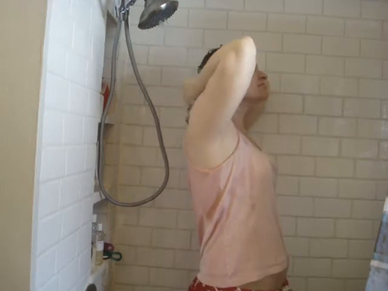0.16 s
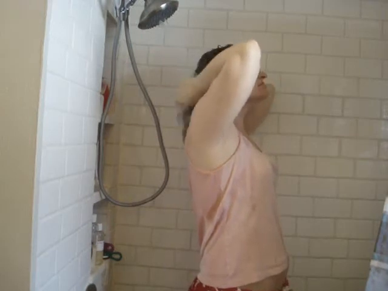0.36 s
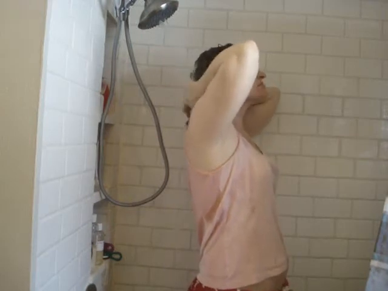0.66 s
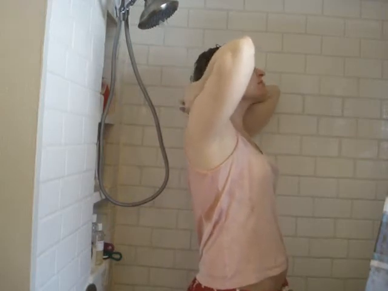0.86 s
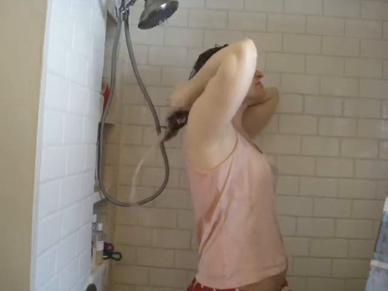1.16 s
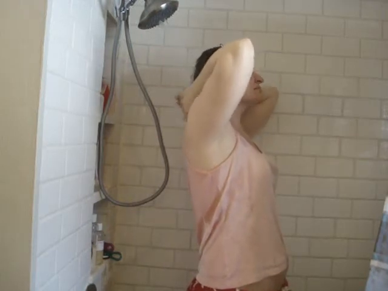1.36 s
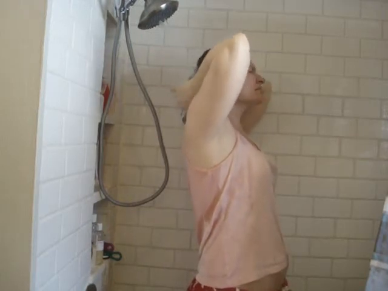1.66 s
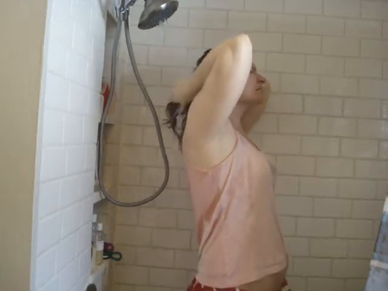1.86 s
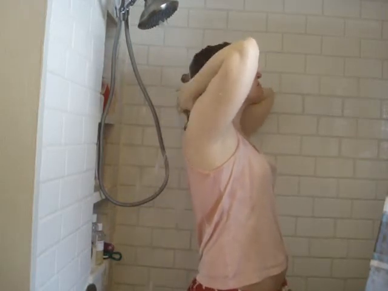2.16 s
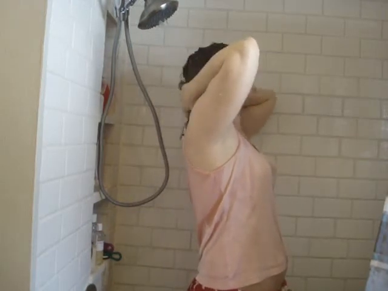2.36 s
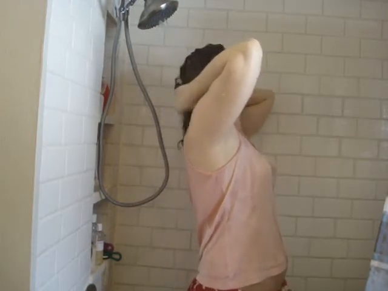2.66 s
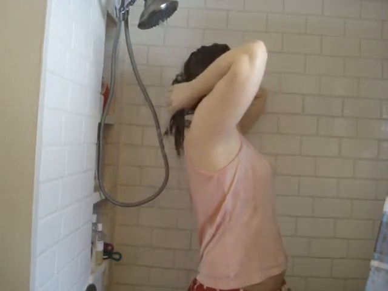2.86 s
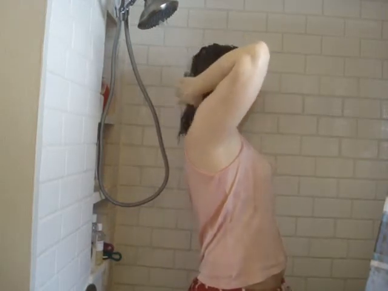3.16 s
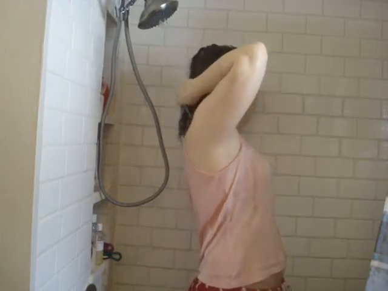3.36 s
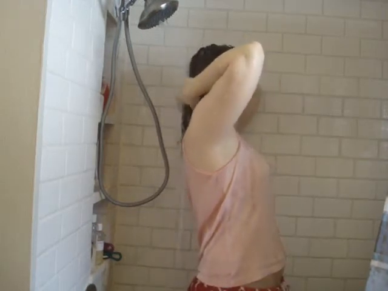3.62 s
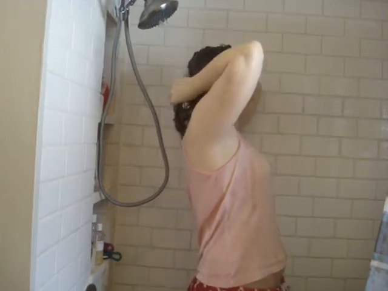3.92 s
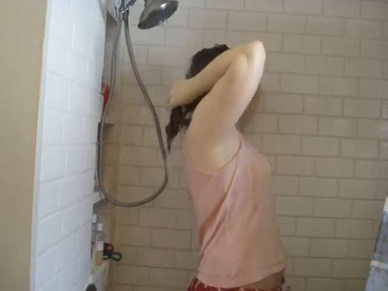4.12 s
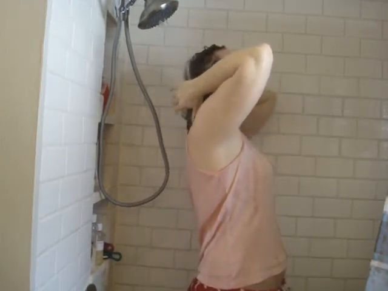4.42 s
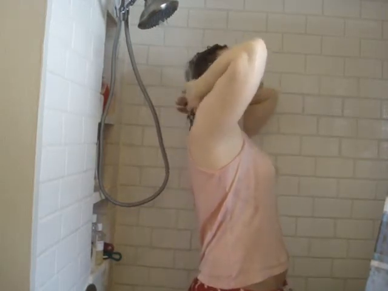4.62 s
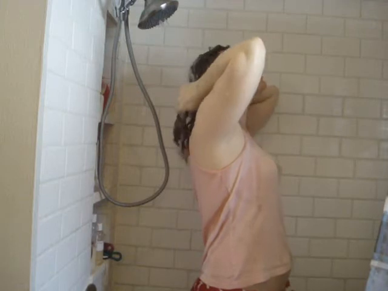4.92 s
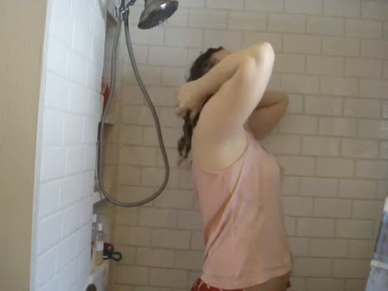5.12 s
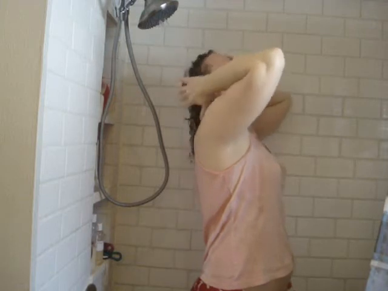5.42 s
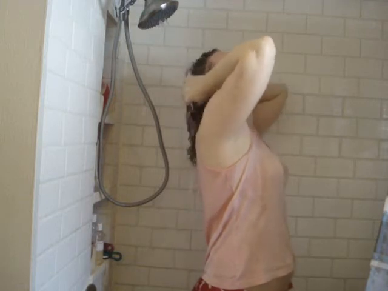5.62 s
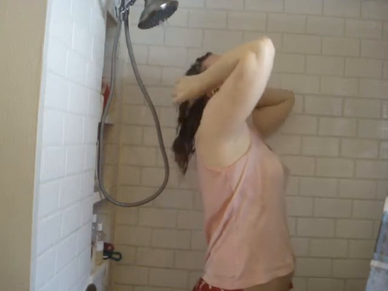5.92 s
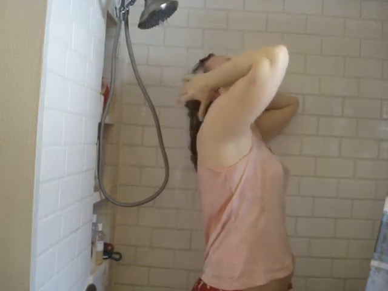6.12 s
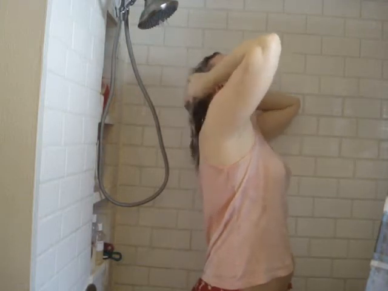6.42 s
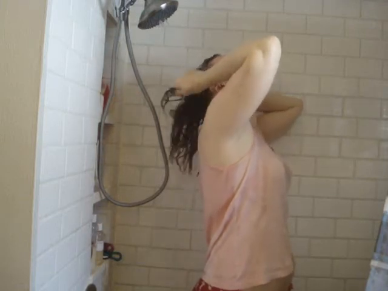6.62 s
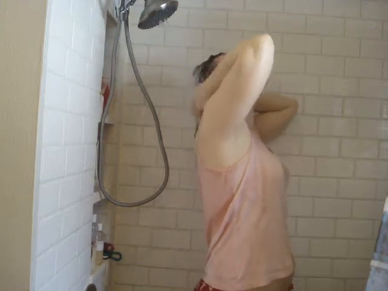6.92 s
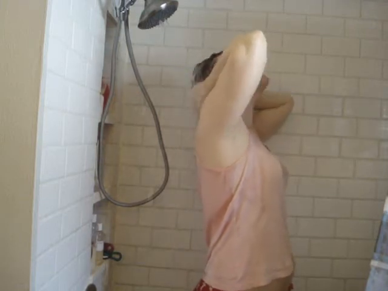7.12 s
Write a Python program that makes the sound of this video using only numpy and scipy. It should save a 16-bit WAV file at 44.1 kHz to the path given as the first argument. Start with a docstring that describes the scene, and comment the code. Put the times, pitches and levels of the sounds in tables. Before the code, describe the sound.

Bright, fine shower spray and uneven pattering run-off, with frequent wet splats on the tub and faint low drumming and burbling beneath.

```python
"""A shower hisses and patters on wet hair in a small tiled bathroom; lumps of water slap on the tub floor.
Spray is random impacts on its own level curve; patter adds ringing air pockets and follows the run-off.
Slaps are bursts of clicks and bubbles, answered by the tiles. Behind them drops drum on the tub through its
resonances and burble in the standing water; a soft low tub ring and a short falling plop are gliding tones.
One mono microphone."""
import sys
import numpy as np
from scipy import signal
from scipy.fft import rfft, irfft, next_fast_len
from scipy.io import wavfile
from scipy.ndimage import map_coordinates

SR = 44100
rng = np.random.default_rng(int(sys.argv[2]) if len(sys.argv) > 2 else 0)


def store_pcm(level_fs):
    """Save levels as 16-bit WAV."""
    pcm = np.round(np.clip(level_fs, -1, 1) * 32767).astype(np.int16)
    wavfile.write(sys.argv[1], SR, np.atleast_2d(pcm).T)


N = 321048


def amp(db):
    """Decibels to gain."""
    return 10 ** (np.asarray(db) / 20)


def unit(x):
    """x scaled to rms 1."""
    return x / np.sqrt(np.mean(x ** 2) + 1e-20)


def along(points, f_hz):
    """(f/Hz, value) points interpolated on a log frequency axis."""
    point_hz, values = np.transpose(points)
    return np.interp(np.log(f_hz + 1), np.log(point_hz + 1), values)


def curves(rows):
    """One value per sample for each column after the time."""
    t_s, *columns = np.transpose(rows)
    return [np.interp(np.arange(N) / SR, t_s, column) for column in columns]


def wobble(rate_hz, size=N):
    """Smooth random curve through rate_hz random knots a second."""
    knots = rng.standard_normal(int(size * rate_hz / SR) + 4)
    return map_coordinates(knots, [np.arange(size) * rate_hz / SR])


def filtered(x, response):
    """x through a complex response of frequency."""
    m = next_fast_len(len(x) + SR // 2)
    spectrum = rfft(x, m) * response(np.fft.rfftfreq(m, 1 / SR))
    return irfft(spectrum, m)[:len(x)]


def coloured(x, colour):
    """x weighted by a (f/Hz, level/dB) colour, at rms 1."""
    return unit(filtered(x, lambda f_hz: amp(along(colour, f_hz))))


def resonating(x, modes):
    """x through parallel (f/Hz, width/Hz, level/dB) resonances of alternating sign, at rms 1."""
    def body(f_hz):
        total = 0
        for k, (mode_hz, width_hz, level_db) in enumerate(modes):
            damping = 1j * f_hz * width_hz
            total = total + (-1) ** k * amp(level_db) * damping / (mode_hz ** 2 - f_hz ** 2 + damping)
        return total
    return unit(filtered(x, body))


def drops(rate_hz, spread_db, size=N):
    """Single-sample impacts of random moment, sign and size, at rms 1."""
    lands = rng.random(size) < rate_hz / SR
    sign = rng.choice([-1, 1], size)
    return unit(lands * sign * amp(spread_db * np.clip(rng.standard_normal(size), -2, 2)))


def bubbles(starts_s, pitch_hz, scatter, cycles, spread_db, size):
    """Trapped air pockets: each rings for a few cycles, rising slightly in pitch."""
    chance = np.clip(rng.standard_normal((len(starts_s), 2)), -2, 2)
    f_hz = np.minimum(pitch_hz * np.exp(scatter * chance[:, :1]), SR / 3)
    step = np.arange(SR // 100)
    turns = f_hz * step / SR
    age = turns / cycles  # in decay constants
    tone = np.sin(2 * np.pi * turns * (1 + 0.027 * np.minimum(age, 2)))
    ring = amp(spread_db * chance[:, 1:]) * np.exp(-age) * tone
    where = (starts_s[:, None] * SR).astype(int) + step
    return np.bincount(where.ravel(), ring.ravel(), size)[:size]


def echo(x, wet_db):
    """x plus the tiles' answer from one spot (decaying noise), at about the same energy."""
    # tile reverberation: (f/Hz, t60/s)
    tiles = [(200, 0.91), (1000, 0.23), (4000, 0.32), (10000, 0.23)]
    f_hz, t_s, noise = signal.stft(rng.standard_normal(SR // 2), SR, nperseg=256)
    decay = amp(-60 * t_s / along(tiles, f_hz)[:, None])
    tail = signal.istft(noise * decay, SR, nperseg=256)[1]
    path = amp(wet_db) * tail / np.linalg.norm(tail)
    path[0] += 1  # direct sound
    return signal.fftconvolve(x, path / np.linalg.norm(path))[:len(x)]


def spray():
    """Fine jets hiss on hair and tiles; heavier run-off patters and fizzes in uneven spurts."""
    # fine spray, changing as the head moves under the jets: (t/s, level/dB)
    hiss = [(0, -29.5), (0.3, -32.5), (0.71, -28), (0.95, -30.5), (1.17, -30), (1.4, -33.5), (1.8, -29.5),
            (2.3, -30.5), (2.7, -27), (3.06, -31), (3.36, -27.5), (4.05, -29), (4.6, -30.5), (4.85, -29),
            (5.9, -28), (6.22, -28.5), (6.44, -28), (7.28, -28)]
    # water running off the hair, swelling as the hands press it out: (t/s, flow re usual/dB)
    runoff = [(0, 0.5), (0.5, -1), (1.0, -3), (1.7, -4.5), (2.06, -1), (2.22, -4), (2.38, -3), (2.7, 4),
              (3.06, -1.5), (3.44, 3.5), (4.1, 0.5), (4.42, 1.5), (4.52, -4.5), (4.82, 1), (5.6, 0.5),
              (5.85, 3), (6.34, -1), (6.72, 3), (7.28, -0.5)]
    # colour of the fine spray: (f/Hz, relative level/dB)
    mist_colour = [(150, -60.5), (600, -25.5), (1500, 1), (3000, -15.5), (5000, -5.5), (7200, 6.5),
                   (8700, 6.5), (10000, 4), (12000, -2.5)]
    # colour of the run-off drops: (f/Hz, relative level/dB)
    patter_colour = [(200, -62), (900, -15.5), (1700, -8), (2050, -7), (2400, -5.5), (3600, -2.5),
                     (5000, 0), (6500, 0), (8000, -7.5), (11000, -27.5)]
    # narrow ringing of the tiled corner: (f/Hz, width/Hz, relative level/dB)
    corner = [(2430, 17, 12.5), (2940, 16, 0), (3750, 35, 15.5), (4060, 63, -8), (4930, 46, -7),
              (5370, 45, -9)]
    usual_db = -26.5  # patter level at the usual flow

    flow_db, = curves(runoff)
    mist_db, = curves(hiss)
    mist = coloured(drops(rate_hz=20000, spread_db=6.0), mist_colour)
    mist = mist * amp(mist_db + 1.2 * wobble(35))

    patter = np.zeros(N)
    for spot in range(3):  # each spot of the floor has its own echo
        starts_s = rng.uniform(0, N / SR, size=3000)
        fizz = bubbles(starts_s, pitch_hz=3600, scatter=0.399, cycles=6.7, spread_db=3.5, size=N)
        impacts = drops(rate_hz=1400, spread_db=4.5) + amp(-4.5) * unit(fizz)
        spurts = amp(2.44 * wobble(35))
        patter += echo(impacts * spurts, wet_db=2.5)
    ringing = resonating(drops(rate_hz=4900, spread_db=2.0), corner)
    heavy = coloured(patter, patter_colour) + amp(-18.5) * ringing
    return mist + heavy * amp(usual_db + flow_db)


def slaps():
    """Each lump of water breaks into a burst of clicks and bubbles that rings out in the stall."""
    # lumps landing: (t/s, level before splash colour/dB, trapped air f/Hz, time scale/s, pitch spread/octaves)
    lumps = [(0.052, -17.5, 3000, .004, 0.37), (0.148, -26.5, 3700, .03, 1), (0.181, -20, 4500, .026, 0.33),
             (0.637, -28, 3430, .035, 1.2), (0.705, -25, 3000, .027, 1.4), (0.813, -26, 3900, .011, 0.67),
             (0.874, -29, 4800, 0.019, .4), (1.185, -22.5, 2830, 0.045, 1.5), (1.224, -23, 4000, .052, 1.3),
             (1.409, -18.5, 2870, 0.0032, 0.8), (1.42, -30, 2450, .028, 0.88),
             (1.458, -27, 3550, 0.014, 0.66), (1.532, -25, 4830, 0.0087, .5),
             (1.817, -23, 3530, 0.015, 0.68), (1.993, -18.5, 2350, .027, 1.2),
             (2.553, -21, 4230, 0.0071, 0.57), (2.574, -23, 4930, 0.033, 0.6),
             (2.628, -28.5, 3650, .07, .6), (2.857, -25.5, 2520, .02, 0.49), (3.388, -28, 2420, .035, 0.55),
             (3.465, -28.5, 2680, 0.022, 0.54), (4.198, -25.5, 4460, .04, 0.61),
             (4.243, -23, 3920, .04, 0.73), (4.28, -22, 3330, .06, 0.81), (4.385, -22.5, 3840, .04, .5),
             (5.807, -28.5, 4000, 0.053, 0.87), (5.897, -25, 2890, .022, .8),
             (6.403, -25, 3760, 0.025, 1.4), (6.711, -24.5, 3270, .019, .6), (6.808, -27, 2800, .04, .6),
             (7.07, -30.5, 7500, .06, 0.76), (7.162, -22, 3460, .024, 1.1)]
    # colour of a splash: (f/Hz, gain/dB)
    splash_colour = [(300, -60), (1100, -27), (1500, -8), (1850, -1), (2300, 1.5), (5000, 1.5), (7000, 5),
                     (10000, 4)]
    scatter_per_octave = 0.26  # scatter of the pockets' natural-log pitch

    out = np.zeros(N + SR)
    t_s = np.arange(SR // 2) / SR
    size = len(t_s)
    for start_s, level_db, pitch_hz, length_s, octaves in lumps:
        starts_s = length_s * rng.beta(1.4, 3, size=70) * 1.7
        pockets = bubbles(starts_s, pitch_hz, scatter_per_octave * octaves, cycles=3.1, spread_db=4.5, size=size)

        # the clicks are centred on the lump's pitch and share its spread
        def band(f_hz):
            return 1 / (1 + (np.log2((f_hz + 1) / pitch_hz) / octaves) ** 4)
        clicks = filtered(drops(rate_hz=6000, spread_db=3.5, size=size), band)
        gobs = amp(2.8 * wobble(170, size=size))  # the lump arrives in pieces
        swell = 1 - np.exp(-t_s / (0.25 * length_s))  # long spills build up, short lumps hit at once
        splatter = clicks * gobs * swell * np.exp(-t_s / (0.81 * length_s))

        burst = unit(unit(pockets) + unit(splatter))
        burst = burst * np.sqrt((length_s + 0.00093) / t_s[-1])  # energy grows with length
        out[round(start_s * SR):][:size] += amp(level_db) * echo(burst, wet_db=-4.0)
    return filtered(out[:N], lambda f_hz: amp(along(splash_colour, f_hz)))


def tub():
    """Drops drum on the tub floor and burble in the standing water, through tub and stall resonances."""
    # jets that pass the body and reach the bare floor: (t/s, level/dB)
    drumming = [(0, -41), (0.48, -40), (0.78, -44.5), (1.08, -38), (1.36, -44.5), (1.6, -42), (2.54, -39),
                (2.74, -49.5), (2.95, -42.5), (3.7, -44), (4.44, -39.5), (4.6, -45), (4.92, -43.5),
                (5.06, -40.5), (5.2, -44), (5.7, -42.5), (6.34, -39.5), (6.6, -44), (7.28, -40.5)]
    # spray falling into the standing water: (t/s, level before the mix gains/dB)
    burbling = [(0, -35), (0.4, -33), (0.88, -37.5), (1.05, -36), (1.36, -38.5), (1.98, -35), (2.66, -37),
                (3.06, -37), (3.25, -32), (3.8, -35.5), (4.42, -36.5), (4.56, -38.5), (5.2, -33.5),
                (5.45, -36.5), (6.35, -32.5), (6.98, -31), (7.28, -34)]
    # tub and stall resonances: (f/Hz, width/Hz, relative level/dB)
    tub_modes = [(146, 12.7, -14.5), (214.8, 7, -9), (239, 12, -10.5), (303, 7.5, -12.5), (322, 17, -24.5),
                 (342.9, 15.9, 2), (372, 29, -2.5), (449, 14, 4), (517.3, 19.6, 3.5), (546, 14.5, 5.5),
                 (612, 18.4, 4.5), (681, 16, 10.5)]
    # stall resonances over the standing water: (f/Hz, width/Hz, relative level/dB)
    stall_modes = [(672.7, 20.5, 2), (718.4, 11.7, 4.5), (765, 7.9, 5), (840.3, 12, -3), (854.3, 8.6, 2.5),
                   (944, 39, -1), (1026, 21, -0.5), (1129, 15, 2.5), (1242, 11.4, 2), (1386, 32, -1),
                   (1513, 9, 2), (1605, 27, 0)]
    # colour of drops in the standing water: (f/Hz, relative level/dB)
    puddle_colour = [(100, -81), (250, -17.5), (420, -13.5), (600, -3.5), (800, 1), (1100, 0), (1600, -4),
                     (2500, -4), (5000, -41), (11000, -52)]

    floor_db, = curves(drumming)
    water_db, = curves(burbling)
    drum = resonating(drops(rate_hz=2500, spread_db=3.5), tub_modes)
    drum = filtered(drum, lambda f_hz: 1 / (1 + (125 / (f_hz + 1)) ** 5))  # the tub radiates no deep bass
    burble = coloured(drops(rate_hz=1800, spread_db=1), puddle_colour)
    stall = resonating(coloured(drops(rate_hz=2500, spread_db=-1), puddle_colour), stall_modes)
    standing_water = amp(-2.5) * burble + amp(-3) * stall
    return amp(floor_db) * drum + amp(water_db) * standing_water


def ring_and_plop():
    """A soft low ring of the tub and a short falling plop, each a gliding tone that swells and fades."""
    # ring, then plop: (t/s, peak level/dB, start f/Hz, glide/(Hz/s), length/s)
    tones = [(6.375, -41, 345, -20, .15), (7.197, -29, 1383, -3000, .048)]
    out = np.zeros(N)
    t_s = np.arange(N) / SR
    for start_s, level_db, pitch_hz, glide_hz_per_s, length_s in tones:
        age_s = np.clip(t_s - start_s, 0, length_s)
        swell = np.sin(np.pi * age_s / length_s)
        turns = (pitch_hz + 0.5 * glide_hz_per_s * age_s) * age_s
        out += amp(level_db) * swell * np.sin(2 * np.pi * turns)
    return out


def scene():
    """All the water and the tub, alike in both channels."""
    water = spray() + slaps() + tub() + ring_and_plop()
    return np.array([water, water])


def record(dry):
    """The microphone channel keeps nothing from its band limit up."""
    top_hz = 10150
    return np.array([filtered(side, lambda f_hz: f_hz < top_hz) for side in dry])


dry = scene()
out = record(dry)
store_pcm(out)
```